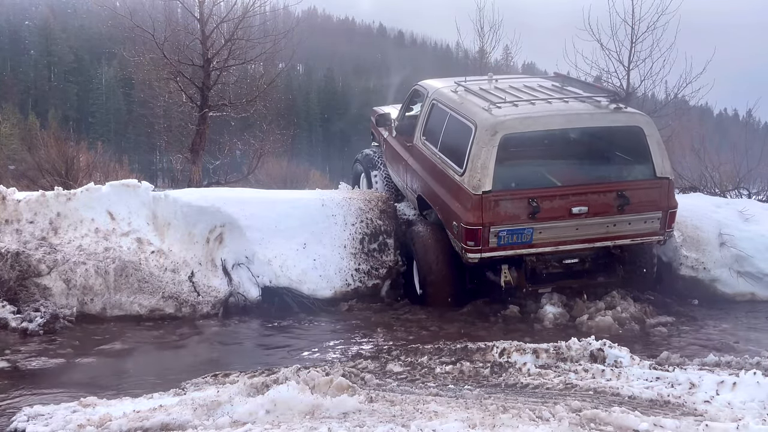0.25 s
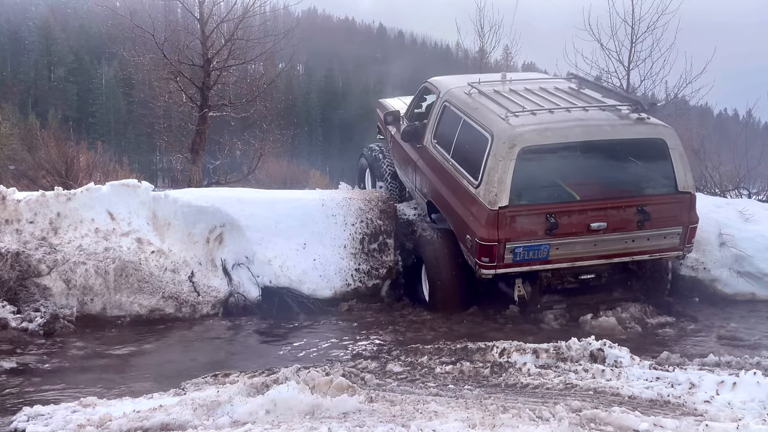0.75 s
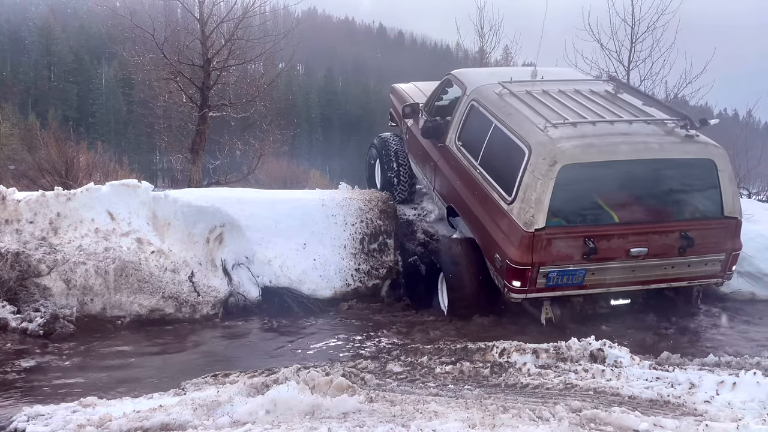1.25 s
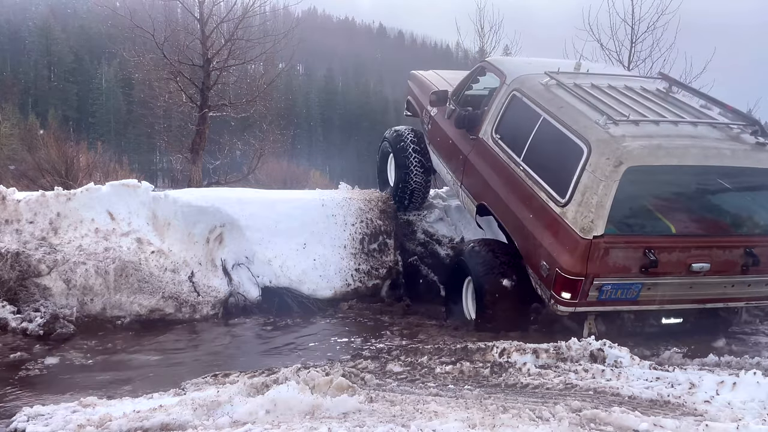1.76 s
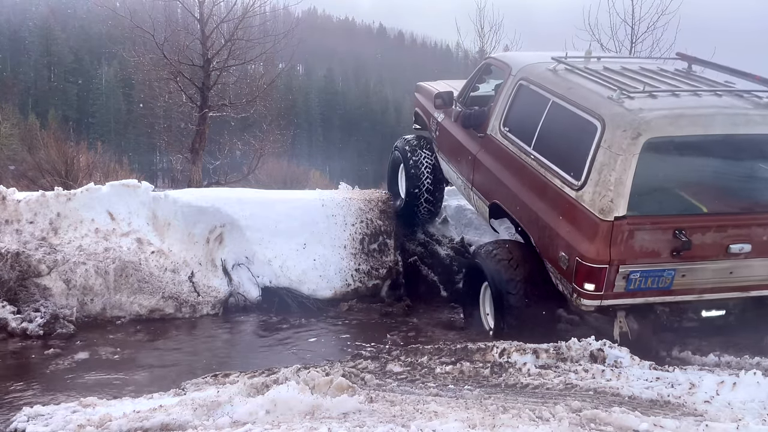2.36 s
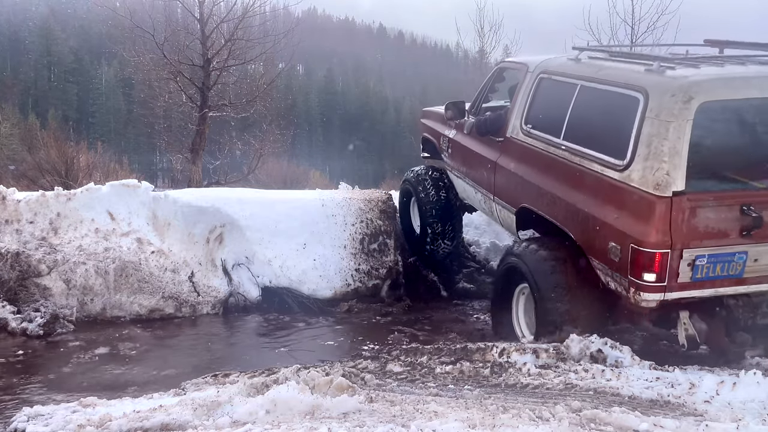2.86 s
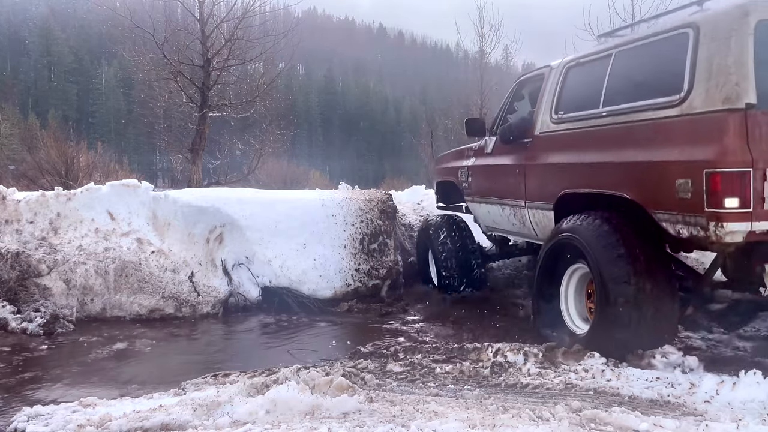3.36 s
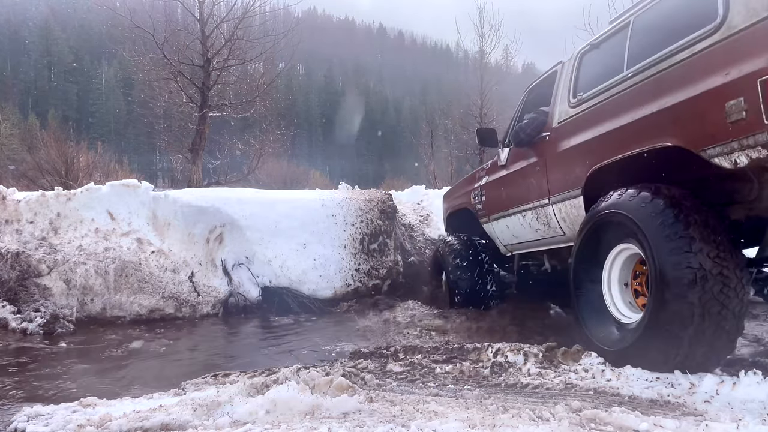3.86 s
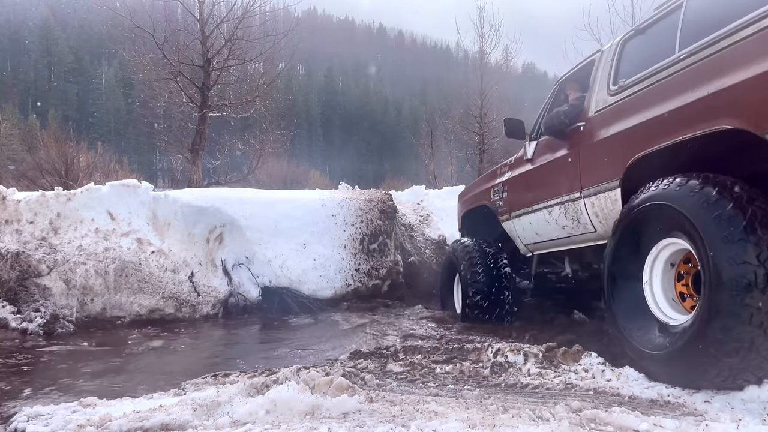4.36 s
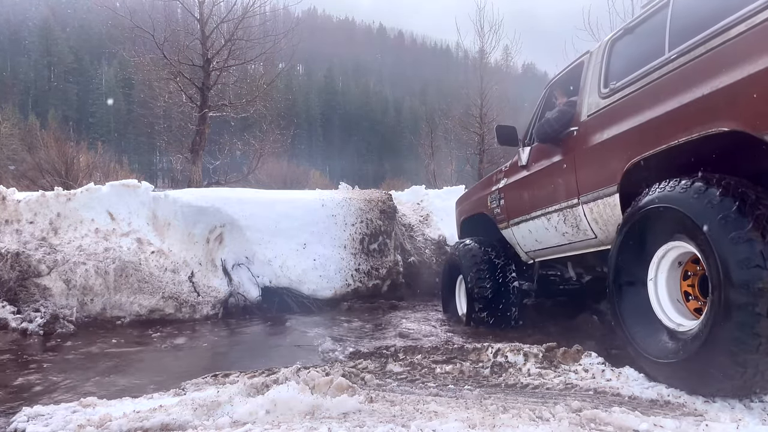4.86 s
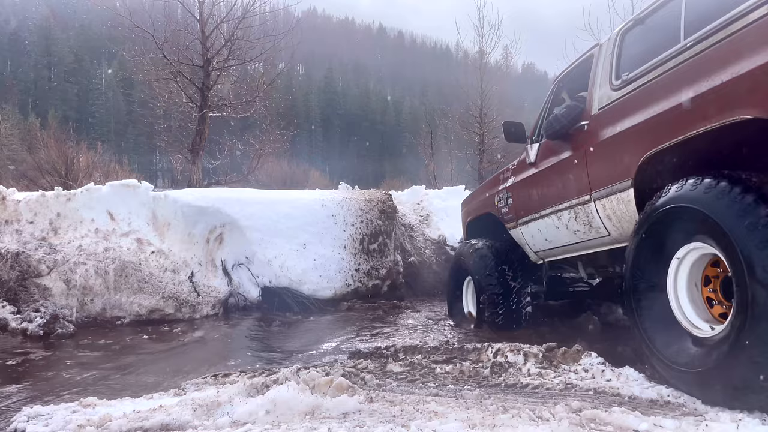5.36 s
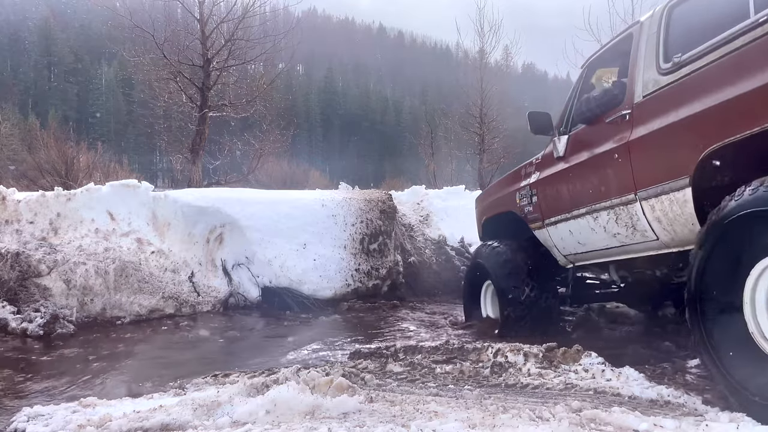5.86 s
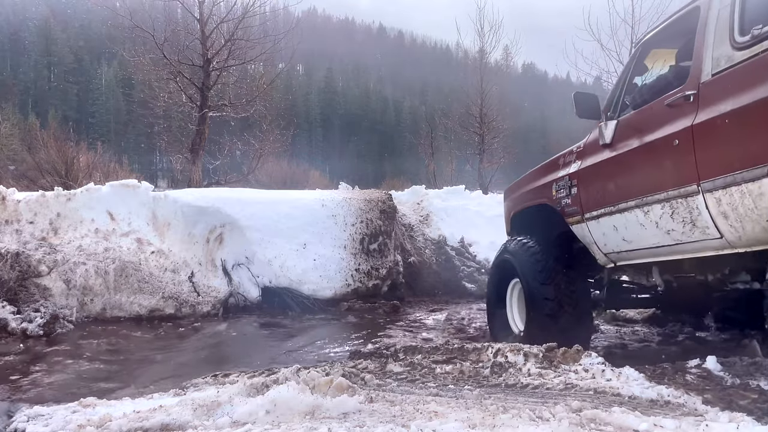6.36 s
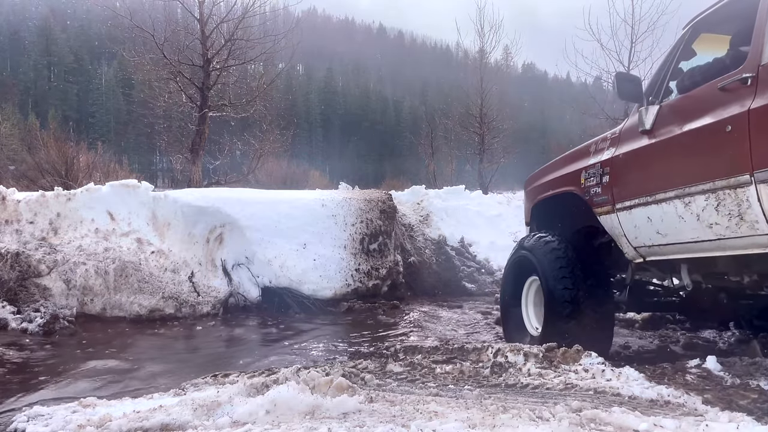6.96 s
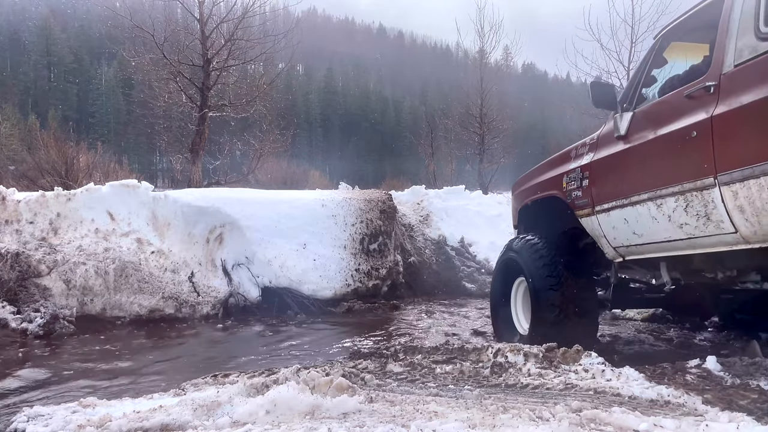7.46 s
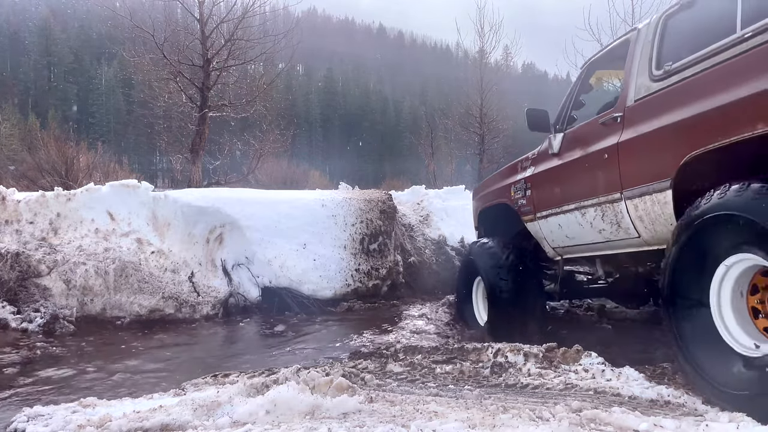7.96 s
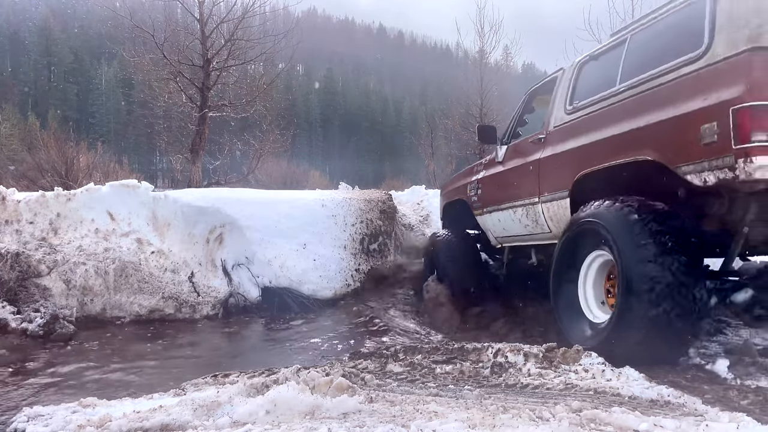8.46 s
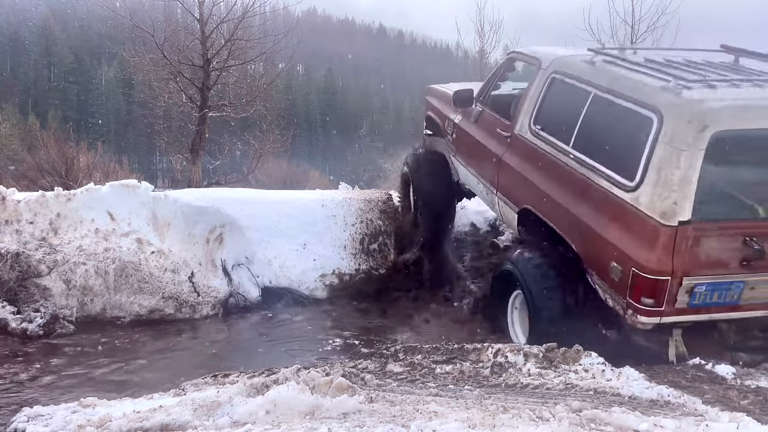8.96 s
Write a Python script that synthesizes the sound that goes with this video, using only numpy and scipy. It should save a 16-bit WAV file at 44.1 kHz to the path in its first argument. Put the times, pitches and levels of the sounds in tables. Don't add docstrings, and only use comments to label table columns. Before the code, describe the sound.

Close phone pickup of an old V8 in slush: throaty uneven exhaust, a brief low drone as it reverses, tappet clicks and loose metal ticks, wet squelches and spray. It revs once, settles to idle with clear knocks, then accelerates hard to a strained, singing high roar that is still held at the end. Open air, deep bass trimmed, loud peaks softly limited, weighted to the right.

```python
import sys
import numpy as np
from scipy import signal
from scipy.fft import rfft, irfft, next_fast_len
from scipy.io import wavfile
from scipy.ndimage import uniform_filter1d

SR = 44100
rng = np.random.default_rng(int(sys.argv[2]) if len(sys.argv) > 2 else 0)


def file_out(sig):
    cols = np.atleast_2d(sig).T
    lim = np.clip(cols, -1, 1)
    pcm = np.round(lim * 32767).astype(np.int16)
    wavfile.write(sys.argv[1], SR, pcm)


def convert_level_to_amplitude(level_db):
    exponent = np.asarray(level_db, float) / 20
    return 10 ** exponent


N = 406602
T = np.arange(N) / SR
SETTLE_S = 1.3


def evened(x):
    return x / np.sqrt(np.mean(x ** 2) + 1e-20)


def curves(rows):
    s, *columns = np.transpose(rows)
    return [np.interp(T, s, c) for c in columns]


def read(points, hz):
    f, value = np.transpose(points)
    return np.interp(np.log(hz + 1), np.log(f + 1), value)


def coloured(x, points):
    size = next_fast_len(len(x))
    gain = convert_level_to_amplitude(read(points, np.fft.rfftfreq(size, 1 / SR)))
    return evened(irfft(rfft(x, size) * gain, size)[:len(x)])


def smooth(x, seconds):
    return uniform_filter1d(x, round(seconds * SR))


def band_pass(x, order, low_hz, high_hz):
    return signal.sosfilt(signal.butter(order, [low_hz, high_hz], "band", fs=SR, output="sos"), x)


def add(mix, s, sound):
    part = mix[max(round(s * SR), 0):][:len(sound)]
    part += sound[:len(part)]


# (time [s], cycle rate [Hz])
SPEED = [(0, 8.4), (1.13, 9), (1.25, 8.85), (1.48, 5.15), (2.2, 5.35), (2.56, 7.45), (2.8, 5.3),
         (3.58, 5.68), (3.85, 5.07), (4.42, 5.26), (5.31, 9.6), (5.69, 9.9), (5.9, 5.5)]
# (time [s], cycle rate [Hz])
PULL = [(7.13, 5.22), (7.61, 11.8), (8.128, 13.05), (8.23, 13.3), (8.464, 15.9), (8.642, 18.7),
        (8.924, 20.1), (9.112, 22.7), (9.22, 24)]


def target_hz():
    return curves(SPEED + PULL)[0]


def engine_hz():
    hunt = 0.035 * np.exp(-T / SETTLE_S) * np.cos(2 * np.pi * 1.75 * (T - 0.2))
    wander = evened(sum(np.sin(2 * np.pi * f * T + f ** 2) / np.sqrt(f) for f in np.geomspace(1.3, 9, num=7)))
    flywheel_s = 0.08
    steady = uniform_filter1d(target_hz(), round(flywheel_s * SR), mode="nearest")
    return steady * (1 + hunt + 0.006 * wander)


def engine_turns():
    return 0.12 + np.cumsum(engine_hz()) / SR


def part_speed():
    speed = engine_hz()
    return smooth(1. * ((speed > 6.5) & (speed < 10.6)), 0.1)


def roughness():
    idle_hz, rough_idle, rough_full, fall = 5.3, 0.155, 0.02, 1.9
    speed = target_hz()
    slowing = np.maximum(-np.gradient(np.log(speed)) * SR, 0)
    return rough_full + (rough_idle - rough_full) * (idle_hz / speed) ** fall + 0.03 * slowing


# (time [s], share of far bank [-1..1], level of cancelling [dB])
BANKS = [(0, -0.94, -0.5), (1.9, -0.8, 0.5), (2.3, -0.82, -19), (2.55, -0.65, -71), (2.8, -1.2, -7.5),
         (3.4, -0.55, 1), (4, -0.88, 0.5), (7.45, -1.28, 0.5), (7.9, -0.24, -4), (8.46, -0.92, -10),
         (8.57, 0.1, -11), (8.95, 0.012, -16), (9.22, 0.99, -36)]
NEAR_BANK = np.array([1, 0, 0, 1, 0, 1, 1, 0])
CYLINDER_DB = [0, -1.5, 1.2, -.6, .4, -2.2, 1.6, -.8]


def firings():
    far = np.clip(curves(BANKS)[0], -1, 1)
    lazy_db = -5.5 - 7 * np.exp(-T / 0.9)
    count = 8 * engine_turns()
    at = np.flatnonzero(np.diff(np.floor(count))) + 1
    cylinder = count[at].astype(int) % len(NEAR_BANK)
    chance = roughness()[at] * rng.standard_normal((1000, 2))[:len(at)].T
    burn_db = np.take(CYLINDER_DB, cylinder) + lazy_db[at] * (cylinder == 0)
    burn = convert_level_to_amplitude(burn_db) * abs(1 + chance[0])
    at = np.clip(at + (chance[1] * .001 * SR).astype(int), 0, N - 1)
    signed, plain = np.zeros((2, N))
    signed[at] = burn * np.where(NEAR_BANK[cylinder], 1, far[at])
    plain[at] = burn * np.where(NEAR_BANK[cylinder], 1, .6)
    return signed, plain


def puffs(clicks, decay_s):
    return evened(signal.lfilter([1], [1, -np.exp(-1 / (decay_s * SR))], clicks))


def boom(drive):
    speed = engine_hz()
    quick_rev = np.gradient(np.log(target_hz())) * SR > 1.2
    hz = np.where((speed > 8) & ~quick_rev, 7 * speed, 58)
    hz = np.where(speed > 10.3, 5 * speed, hz)
    lead_in = (len(drive) - N, 0)
    hz = np.pad(smooth(hz, 0.015), lead_in, "edge")
    turn = np.exp(2j * np.pi * np.cumsum(hz) / SR)
    shifted = band_pass(drive, 3, 44, 130) / turn
    rings = []
    for width_hz in (15, 34):
        r = np.exp(-np.pi * width_hz / SR)
        slow = signal.lfilter([(1 - r) ** 2], np.convolve([1, -r], [1, -r]), shifted)
        rings.append((turn * slow).real)
    tight, loose = rings
    share = np.pad(0.18 * part_speed(), lead_in, "edge")
    return tight + share * (loose - tight)


def lull(turns):
    dip = np.exp(44 * (np.cos(2 * np.pi * (turns - 0.092)) - 1))
    return 0.56 + (-4 - 4.5 * np.exp(-T / SETTLE_S)) * dip


# (low edge [Hz], mode [Hz], high edge [Hz], width [Hz])
PIPE = [(78, 101, 140, 55), (136, 170, 197, 30), (222, 270, 315, 45), (310, 385, 450, 80),
        (445, 490, 512, 40), (640, 730, 800, 70)]
# (time [s], throttle [0-1])
THROTTLE = [(0, 0.58), (.9, 0.53), (1.25, 0.36), (1.46, 0), (2.15, 0.03), (2.35, 0.32), (2.6, 0.25),
            (2.75, 0.26), (4.4, 0.16), (5.13, 0.69), (5.65, 0.57), (5.87, 0.07), (7.12, 0.18), (7.22, 0.53),
            (7.42, 0.69), (8.45, 0.8), (8.86, 0.93), (9.22, 1)]
# (time [s], level [dB])
PRESSURE = [(.1, -24), (1.23, -22.5), (1.46, -30), (1.85, -22), (2.44, -26), (2.8, -37), (2.92, -28.5),
            (3.52, -40.5), (3.77, -25.5), (4.54, -19.5), (5.62, -21), (5.8, -27), (6.16, -21), (7.4, -17),
            (7.91, -12), (8.66, -15), (8.97, -29.5), (9.22, -24)]
# (offset [dB], share of pressure [ratio],
# level at full throttle [dB], share of bank cancelling [ratio], evenness across engine orders [0-1])
MODE_LAW = [(2.5, 0.9, -3.06, -0.097, .99), (-25, 0.22, 15.5, .99, .6), (-37, 0.2, 24.5, -0.12, .8),
            (-49, 0.23, 30.5, 0.4, .9), (-53, 0.059, 29.5, 0.095, .8), (-58, 0.095, 31.5, 0.000026, .6),
            (-62.5, 0.081, 32.5, 0.25, .6)]
OPENING = [0.81, 0.82, 0.39, 0.96, 0.97, 0.96, 1.74]
# (swing [dB], loudest point [cycles], share of the lull [ratio])
THROB = [(4, 0.7, 1), (0, 0.7, 1), (0, .6, 1), (2.5, 0.077, 0.03), (4, 0.1, 0), (4.5, 0.1, 0),
         (5.5, .07, 0.31)]


def exhaust(signed, plain):
    rasp = roughness() + .09 * np.exp(-T / SETTLE_S)
    gas = evened(puffs(plain, 0.036) * rng.standard_normal(N)) * rasp
    pulses = evened(signed)
    cycle = round(SR / SPEED[0][1])
    pulses, gas = np.r_[pulses[:cycle], pulses], np.r_[gas[:cycle], gas]
    rings = [boom(pulses)]
    for (low, hz, high, width), noisy in zip(PIPE, (.5, .8, 2.5, 5, 6, 8)):
        band = band_pass(pulses + noisy * gas, 4, low, high)
        rings.append(signal.lfilter(*signal.iirpeak(hz, hz / width, SR), band))
    fast = np.interp(target_hz(), (15, 19), [0, 1])
    fast_dbs = [0, 0, 0, -2, -5, -3, -3]
    turns, part = engine_turns(), part_speed()
    lull_db = lull(turns) * part
    pressure_db, throttle, cancel_db = curves(PRESSURE)[0], curves(THROTTLE)[0], curves(BANKS)[1]
    out = np.zeros(N)
    for ring, law, power, fast_db, throb in zip(rings, MODE_LAW, OPENING, fast_dbs, THROB):
        db, push, open_db, cancel, even = law
        swing_db, top, share = throb
        ring = evened(ring)
        strength = smooth(smooth(ring ** 2, .19), .1)
        level_db = db + push * pressure_db + open_db * throttle ** power
        level_db += cancel * cancel_db + fast_db * fast + share * lull_db
        level_db += swing_db * part * np.cos(2 * np.pi * (turns - top))
        steadied = ring / (abs(strength) + 1e-12) ** (even / 2)
        out += convert_level_to_amplitude(level_db) * steadied[cycle:]
    return out


# (time [s], level [dB])
NEAR = [(0, -13.5), (1.4, -4), (2.3, -0.5), (3.3, -2), (4.4, 1), (5.5, 1.5), (6.6, 3), (7.5, 3),
        (8.45, 1.5), (8.7, 7), (8.94, 1.5), (9.22, 1.5)]


def roar_level():
    return -36 + curves(NEAR)[0] + 9.5 * curves(THROTTLE)[0]


# (time [s], level [dB])
CHURN = [(0, -5.5), (1.4, -1.5), (2.5, -1.5), (2.92, 3), (3.3, 4), (3.77, 8), (4.45, -0.5), (5.5, 1),
         (6.2, 2), (7.1, -3.5), (7.4, 1.5), (8.2, 7), (8.7, 11), (8.94, 9.5), (9.22, 10.5)]
# (pitch [Hz], level [dB per Hz])
ROAR = [(150, 1.5), (260, -1.5), (312, -7), (599, -18), (736, -11), (816, -29.5), (1140, -20), (1700, -19),
        (2130, -17.5), (2600, -24.5), (3330, -28.5), (4000, -34), (5200, -50), (8800, -120)]
# (pitch [Hz], level [dB per Hz])
FIZZ = [(1530, -15), (2600, -6.5), (3350, -12), (4730, -10.5), (5150, -10), (5520, -17.5), (5900, -13),
        (6680, -15), (7100, -16.5), (7550, -25), (7930, -20), (9210, -19), (12100, -17.5), (13900, -28.5),
        (15000, -35), (15600, -59)]


def rush(plain):
    near_db, churn_db = curves(NEAR)[0], curves(CHURN)[0]
    fizz_db = -49.5 + churn_db + 0.52 * near_db + 4 * curves(THROTTLE)[0]
    dull_db = -9 - 0.27 * near_db + 0.41 * churn_db
    short_clumps, long_clumps = [evened(smooth(smooth(rng.standard_normal(N), s), s)) for s in (.012, .04)]
    breath = (1 + 0.22 * puffs(plain, 0.071)) * convert_level_to_amplitude(1.2 * short_clumps)
    gusts = breath * rng.standard_normal((2, N))
    dull = evened(band_pass(gusts[1], 2, 520, 1300))
    roar = coloured(gusts[0], ROAR) + convert_level_to_amplitude(dull_db) * dull
    grain_size = convert_level_to_amplitude(3.8 * np.minimum(rng.exponential(1, N), 4))
    grains = grain_size * (rng.random(N) < 3000 / SR) * rng.choice([-1, 1], N)
    hiss = 0.92 * evened(grains) + rng.standard_normal(N)
    fizz = coloured(hiss * convert_level_to_amplitude(0.68 * short_clumps + 1.3 * long_clumps), FIZZ)
    return convert_level_to_amplitude(roar_level() + 3) * roar + convert_level_to_amplitude(fizz_db + 4) * fizz


def rumble():
    return convert_level_to_amplitude(-72) * coloured(rng.standard_normal(N), [(8, -45), (20, -16), (34, -2), (55, 16), (110, -46)])


def clink(hz, chance, t60):
    t = np.arange(0, .7 * t60, 1 / SR)
    cluster = sum(np.sin(2 * np.pi * ((hz + 560 * (a - .5)) * t + b)) for a, b in chance)
    tones = np.sin(2 * np.pi * hz * t) + 0.59 * cluster
    return convert_level_to_amplitude(-60 * t / t60) * tones * np.minimum(t / 0.001, 1)


# (time [s], peak level [dB], ring [Hz])
TICKS = [(0.019, -34, 1820), (0.7322, -30, 2000), (1.3049, -24.5, 2250), (1.05, -44, 2200),
         (1.5579, -32, 2040), (1.7469, -34, 2070), (2.0971, -29, 2190), (2.3027, -40, 2160),
         (3.1098, -27, 2170), (4.5401, -27, 2010), (5.8721, -39, 1940), (5.9643, -32, 2090),
         (6.0626, -25, 2150), (6.2657, -16.5, 2190), (6.4532, -24, 2230), (6.6453, -19.5, 2230),
         (6.8314, -29, 2100), (7.0195, -22.5, 2180), (7.8176, -30, 2360), (6.215, -25.5, 2050),
         (0.9615, -44, 2170), (1.938, -29, 2240), (2.189, -29.5, 1920), (2.361, -26, 1990),
         (2.4573, -26, 2030), (3.177, -25, 1970), (4.0531, -20.5, 2130), (4.4902, -27, 2080),
         (4.676, -25, 2540), (4.7466, -24, 2230), (4.8738, -23, 2180), (4.9074, -25, 2340),
         (5.0554, -23, 1890), (5.5303, -25, 2350), (5.6224, -22, 2600), (5.914, -27, 1570),
         (6.0117, -24.5, 2135), (6.1655, -23, 2160), (6.335, -19, 1810), (6.3575, -22, 2045),
         (6.5286, -38, 2260), (5.0287, -25, 2340), (5.234, -33, 1930), (7.2638, -21, 2005),
         (7.3856, -21, 2000), (7.8449, -25, 2220), (8.2147, -37, 1990), (3.5289, -27, 1920),
         (6.4035, -20, 1420), (7.1137, -22, 2050), (7.199, -21, 2050), (7.2355, -23.5, 2020),
         (7.6893, -18, 1990), (7.9403, -15.5, 2360), (8.5254, -18, 1596), (8.849, -9, 2376)]
# (first time [s], last time [s], peak level [dB], ring [Hz])
TAPPET = [
    (3.262, 3.838, -26, 2190),
    (4.223, 4.417, -21, 2200),
    (6.712, 6.901, -24, 2095),
]
# (time [s], peak level [dB],
# ring [Hz])
PANEL_KNOCKS = [(0.7265, -32, 620), (0.733, -24, 780), (3.368, -27, 1063), (3.3, -27, 626), (8.64, -11, 1130),
                (8.77, -15, 1020), (1.306, -26.5, 900), (3.274, -25, 3050), (3.277, -26, 1000), (3.286, -26, 900),
                (4.061, -21.5, 900), (4.066, -22, 2750), (4.063, -25, 4050), (6.19, -29, 3900), (8.849, -28, 4600),
                (8.85, -23, 6600)]
# (time [s], peak level [dB], ring [Hz])
SQUEAKS = [
    (3.5864, -26, 4950),
    (6.014, -33, 3750),
]
# (time [s], peak level [dB], ring [Hz], time to fade by 60 dB [s])
CLANK = (8.851, -17, 2419, 0.12)


def ticks():
    out = np.zeros(N)
    knocks = list(TICKS)
    for first, last, db, hz in TAPPET:
        count = round((last - first) * 5.3) + 1
        knocks += [(s, db, hz) for s in np.linspace(first, last, count)]
    for (s, db, hz), chance in zip(knocks, rng.random((99, 5, 2))):
        add(out, s - .001, convert_level_to_amplitude(db - 8.5) * clink(hz, chance, 0.091))
    for (s, db, hz), chance in zip(PANEL_KNOCKS, rng.random((20, 3, 2))):
        add(out, s, convert_level_to_amplitude(db - 4.5) * clink(hz, chance, 0.082))
    for s, db, hz in SQUEAKS:
        add(out, s, convert_level_to_amplitude(db) * clink(hz, [(.4, 0.47), (.65, .7)], 0.098))
    s, db, hz, t60 = CLANK
    add(out, s, convert_level_to_amplitude(db) * clink(hz, [], t60))
    patter = np.zeros(N)
    for place, pitch, size, *chance in rng.random((1700, 7)):
        faint = clink(1750 + 800 * pitch, np.reshape(chance, (2, 2)), 0.07)
        add(patter, place * N / SR, convert_level_to_amplitude(12 * size) * faint)
    return out + convert_level_to_amplitude(roar_level() + 0.2 * curves(NEAR)[0] - 13) * evened(patter)


# (time [s], peak level [dB], level of dull part [dB], time to fade by 60 dB [s],
# brightness [dB per octave])
SPLASHES = [(4.068, -25, 0, 0.17, 0), (0.9108, -27, -12, 0.06, 0), (0.019, -52, 18, .05, -6),
            (1.3059, -40, 10, 0.1, 3), (1.4526, -33, -5, 0.078, 7), (2.7556, -29, -8, 0.14, -1.5),
            (3.2525, -34, -4, .1, 0), (3.3308, -28, 4, .15, -5), (3.367, -37, 11, .15, -6),
            (8.3315, -26, -9, .05, -3), (3.274, -23, 4, 0.45, 2), (3.295, -24.5, 0, 0.3, 3),
            (3.359, -33, -2, 0.076, 7), (3.5887, -38, -9, 0.11, 7), (3.6494, -44, 1, 0.14, -3),
            (3.286, -27, 7, .1, -6), (3.669, -34, -15, .03, 9), (4.0605, -20, 0, 0.1, -2),
            (6.0057, -34, 6, 0.14, -1), (6.1784, -30.5, 7, 0.146, 6), (6.1858, -22.5, -6, 0.11, 2),
            (6.2682, -25, -1, 0.07, 6), (6.326, -35, -5, 0.22, 9), (6.7694, -29, -15, 0.18, 3),
            (7.9394, -47, -9, 0.14, -6), (8.522, -24, 5, 0.6, -7), (8.58, -29, 9, .6, -8),
            (8.69, -30, 11, .6, -10), (8.76, -26, -9, .5, 6), (8.8475, -7, -18, 0.045, 2)]


def splashes():
    out, t = np.zeros(N), np.arange(11000) / SR
    for (s, db, dull_db, t60, tilt_db), noise in zip(SPLASHES, rng.standard_normal((32, 3, len(t)))):
        drops = convert_level_to_amplitude(evened(smooth(noise[2], 0.02)))
        top_hz = 7000 if tilt_db > 0 else np.inf
        colour = [(hz, level + tilt_db * np.log2(min(hz, top_hz) / 5000)) for hz, level in FIZZ]
        slap = evened(band_pass(noise[1] * drops, 3, 430, 3000))
        spray = coloured(noise[0] * drops, colour) + convert_level_to_amplitude(dull_db + 2) * slap
        fade = convert_level_to_amplitude(db - 10 - 60 * t / t60) * np.minimum(t / 0.00028, 1)
        add(out, s - .0005, fade * spray)
    return out


# (time [s], moan [Hz], level [dB])
MOANS = [
    [(0.68, 184.7, -26), (0.78, 205, -37), (0.846, 226, -35), (0.896, 237, -35), (1.004, 255, -40),
     (1.05, 263.4, -41)],
    [(7.13, 272.6, -45), (7.176, 273.7, -40), (7.212, 267.7, -29), (7.244, 269.5, -26), (7.33, 277.8, -35)],
]
# (time [s], howl [Hz], level [dB])
HOWLS = [
    [(5.1, 520, -44), (5.27, 515, -36), (5.5, 507, -45)],
    [(7.36, 512, -32), (7.41, 520, -31.5), (7.49, 505, -42)],
    [(8.48, 725, -30), (8.53, 735, -29), (8.6, 730, -38)],
    [(8.77, 594, -38), (8.83, 592, -33), (8.89, 595, -29)],
    [(7.42, 906, -41), (7.45, 884, -35), (7.5, 900, -45)],
    [(0.05, 386, -51), (0.24, 392, -36), (0.36, 385, -48)],
    [(4.55, 242, -45), (4.75, 249, -37.5), (5.0, 256, -35.5)],
]
# (time [s], drone [Hz], level [dB])
DRONE = [
    (2.4, 181.7, -31),
    (2.5, 182, -23),
    (2.58, 178.4, -20),
    (2.67, 185.5, -27),
]


def moans():
    out = np.zeros(N)
    drone = [(s, hz, db + 1) for s, hz, db in DRONE]
    for rows in MOANS + HOWLS + [drone]:
        s, hz, db = np.transpose(rows)
        t = np.arange(s[0], s[-1], 1 / SR)
        tone = np.sin(2 * np.pi * np.cumsum(np.interp(t, s, hz)) / SR)
        tone *= signal.windows.tukey(len(t), .4)
        add(out, s[0], convert_level_to_amplitude(np.interp(t, s, db) + 5) * tone)
    return out


# (order [number], start time [s], loudest time [s], end time [s], level [dB])
SINGING = [(3, 8.58, 9.2, 9.6, -11), (3, 8.5, 8.7, 10, -33), (10, 8.25, 8.48, 8.95, -17.5),
           (12, 8.15, 8.37, 8.6, -22), (9, 8.8, 9.0, 8.7, -20.5), (13, 8.98, 9.2, 9.5, -17.5),
           (16, 8.6, 8.8, 9.0, -23), (18, 8.5, 8.65, 8.85, -20.5), (18, 8.7, 8.9, 9.05, -23.5),
           (22, 8.55, 8.85, 9.0, -24.5), (23, 8.5, 8.77, 8.92, -24), (13, 9.4, 8.72, 8.1, -24),
           (23, 7.45, 7.5, 8.15, -27), (28, 7.55, 7.85, 8.1, -29.5), (11, 4.93, 4.5, 6.34, -19.5),
           (24, 5.05, 6.1, 5.53, -28), (28, 5.3, 5.58, 5.85, -28), (8, 8.57, 9.15, 12, -21),
           (11, 4.35, 4.73, 4.9, -17.5), (19, 5.55, 5.63, 5.8, -25.5), (5, 5.46, 5.7, 5.78, -17),
           (11, 7.45, 8, 8.64, -21.5), (17, 7.74, 8.05, 8.1, -26), (8, 8.58, 8.8, 9.05, -21.5),
           (24, 4.8, 4.44, 5.15, -26), (22, 8.96, 9.03, 9.11, -26.5), (8, 4.76, 4.4, 5.15, -15.5),
           (21, 8.65, 8.8, 8.95, -28), (19, 9.05, 9.15, 11, -29)]


def singing():
    turns, out = engine_turns(), np.zeros(N)
    for (order, start, top, end, db), phase in zip(SINGING, rng.random(30)):
        part = slice(round(start * SR), round(end * SR))
        swell = np.sin(np.pi / 2 * np.interp(T[part], [start, top, end], [0, 1, 0]))
        out[part] += convert_level_to_amplitude(db) * swell * np.sin(2 * np.pi * (order * turns[part] + phase))
    return out


# (pitch [Hz], left minus right level [dB])
BALANCE_DB = [(60, -3), (110, -5.5), (400, -7), (700, -6.5), (1200, -5.5), (2000, -6), (3300, 0.5),
              (5200, 1.7), (6100, -3.5), (7600, 3), (9100, 0.5), (10200, 0), (15000, 1)]
# (pitch [Hz], lead [radians])
LEAD = [(0, -.2), (520, -1.5), (2500, -0.6), (4480, -0.4), (5170, 2.8), (5860, 3.3), (6370, 5.4),
        (7060, 6.0), (7750, 3.1), (8350, 3.3), (10400, 2.2), (12300, 0.8), (12600, 0.1), (15200, -0.0)]
# (pitch [Hz], likeness [0-1])
SAME = [(60, 0.995), (150, 0.99), (300, .94), (600, .55), (950, .25), (2050, .8), (2600, .65), (3050, .1),
        (4800, .25), (5600, .55), (6700, .85), (7400, .15), (7950, .9), (9100, .4), (11000, .8),
        (12300, .77), (13300, 1)]


def scene():
    signed, plain = firings()
    truck = exhaust(signed, plain) + moans() + rush(plain) + rumble() + singing()
    layers = np.array([truck, ticks() + splashes(), splashes()])
    hz, _, (steady, sharp, other) = signal.stft(layers, SR, nperseg=1024, noverlap=768, boundary="odd")
    same = read(SAME, hz)[:, None]
    unlike = np.sqrt(1 - same ** 2)
    scatter = 1.5 * np.exp(2j * np.pi * rng.random(steady.shape[::-1]).T)
    left = steady * (same + unlike * scatter) + (1 + same) / 2 * sharp + unlike * 0.83 * other
    left = left * np.exp(1j * np.interp(hz, *np.transpose(LEAD)))[:, None]
    tilt = convert_level_to_amplitude(read(BALANCE_DB, hz) / 2)[:, None]
    sides = np.array([left * tilt, (steady + sharp) / tilt])
    return signal.istft(sides, SR, nperseg=1024, noverlap=768)[1][:, :N]


def band_limit(x):
    return signal.sosfilt(signal.butter(12, 15710, fs=SR, output="sos"), x)


def record(dry):
    limited = 0.78 * np.tanh(dry / 0.93)
    mix = signal.sosfilt(signal.butter(3, 39, "high", fs=SR, output="sos"), limited)
    return band_limit(mix)


dry = scene()
out = record(dry)
file_out(out)
```